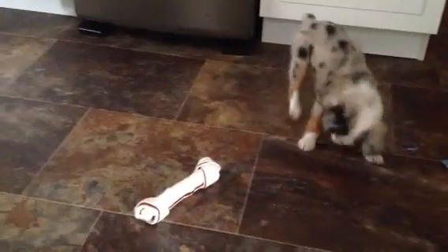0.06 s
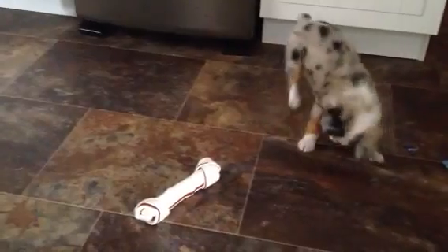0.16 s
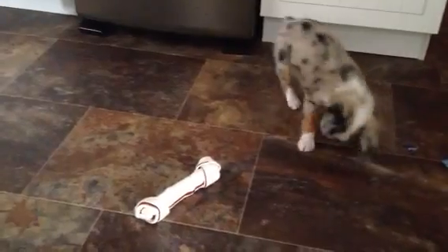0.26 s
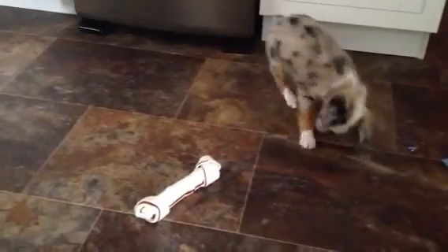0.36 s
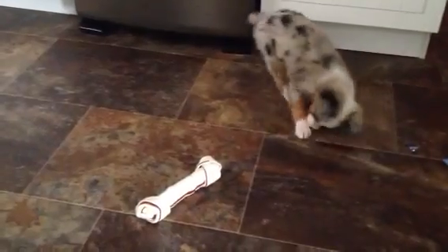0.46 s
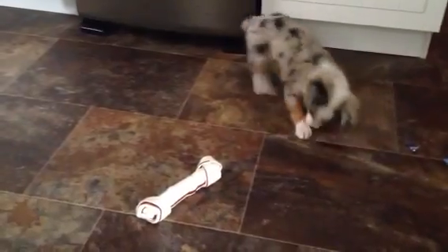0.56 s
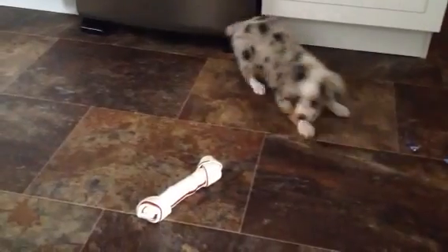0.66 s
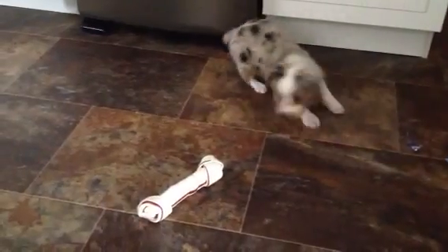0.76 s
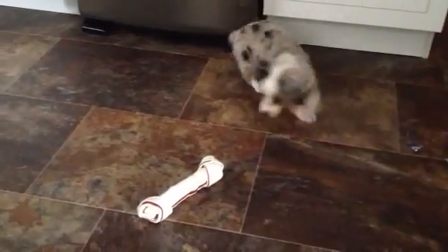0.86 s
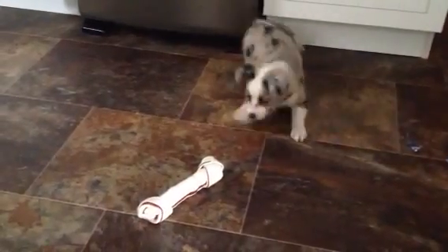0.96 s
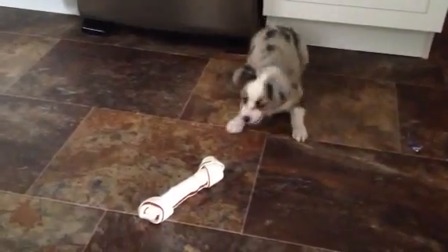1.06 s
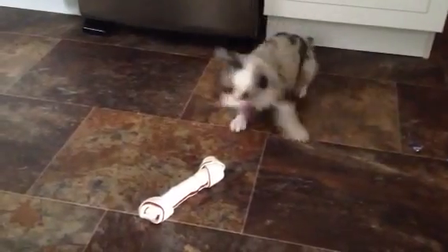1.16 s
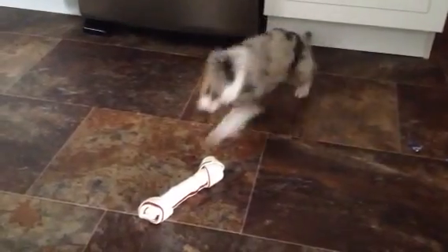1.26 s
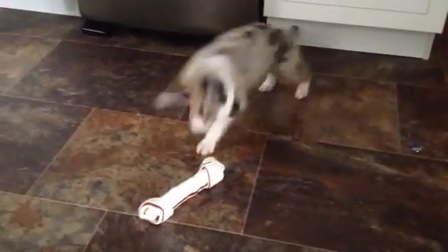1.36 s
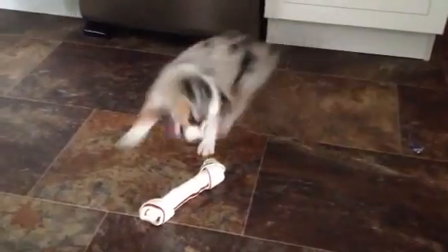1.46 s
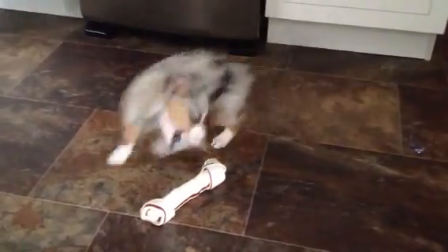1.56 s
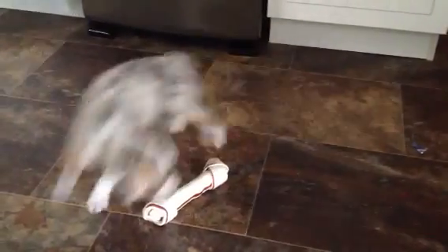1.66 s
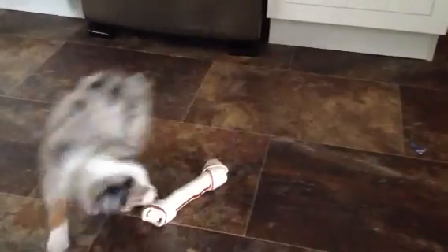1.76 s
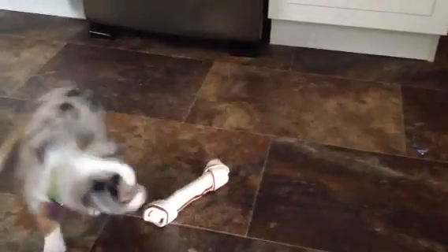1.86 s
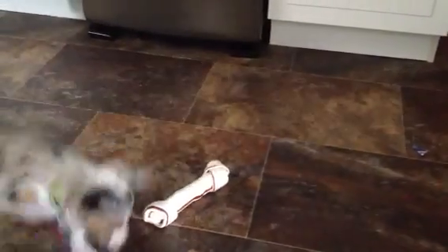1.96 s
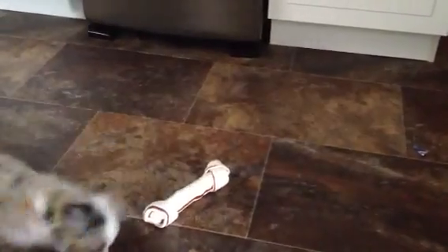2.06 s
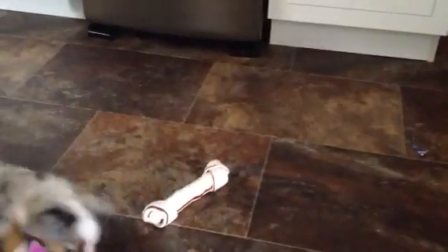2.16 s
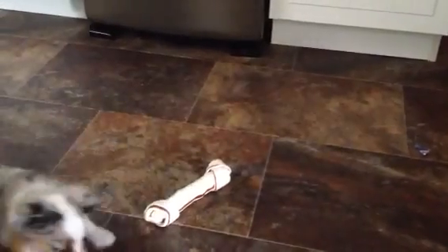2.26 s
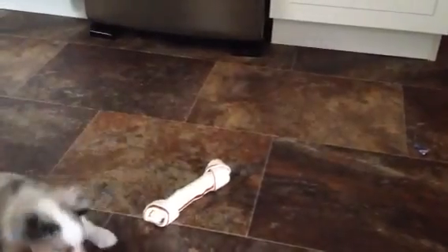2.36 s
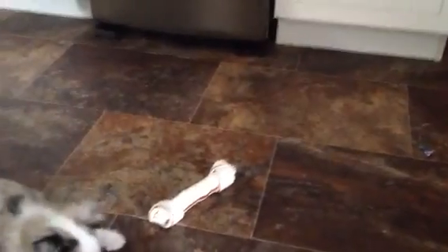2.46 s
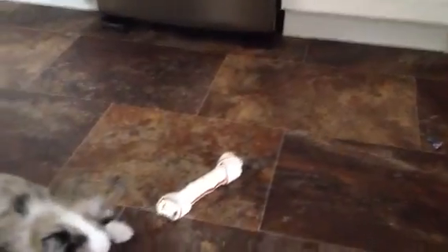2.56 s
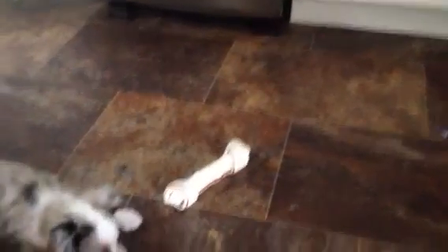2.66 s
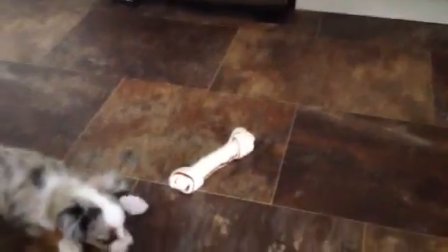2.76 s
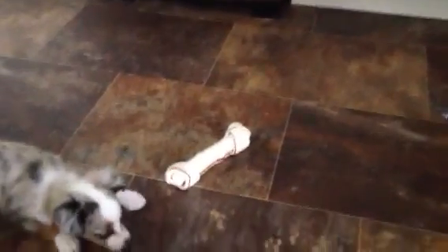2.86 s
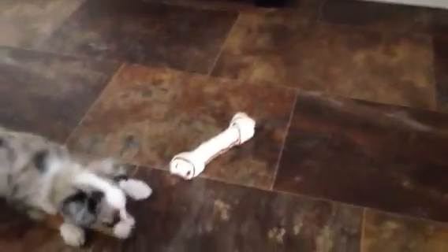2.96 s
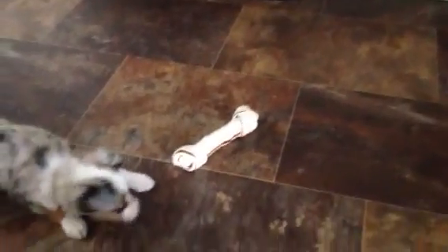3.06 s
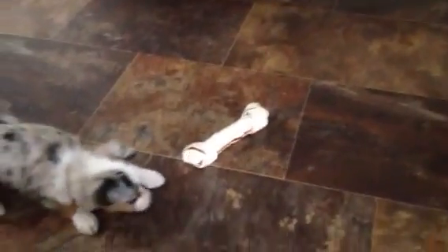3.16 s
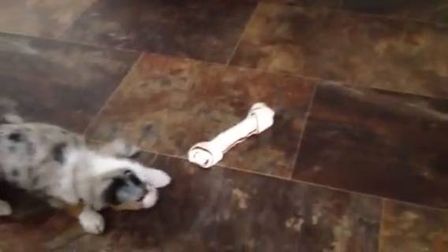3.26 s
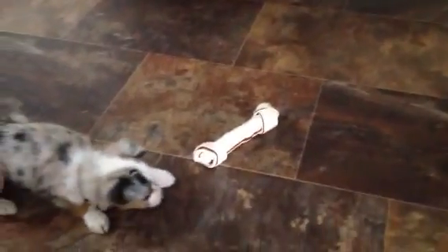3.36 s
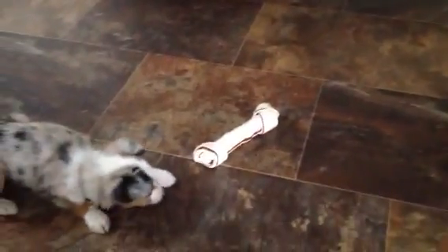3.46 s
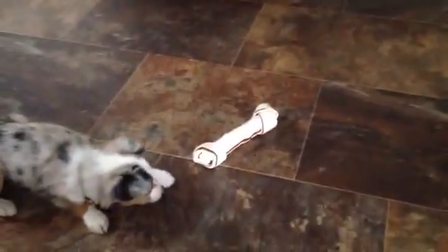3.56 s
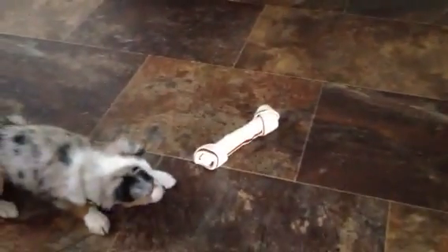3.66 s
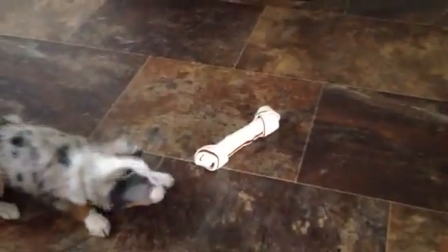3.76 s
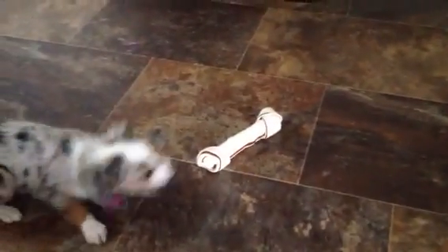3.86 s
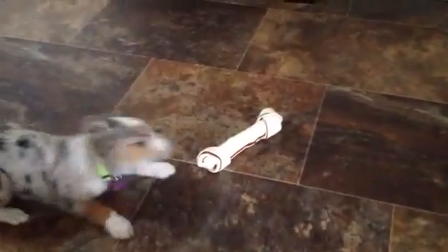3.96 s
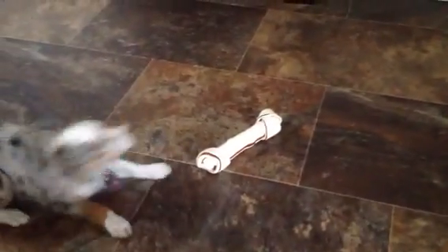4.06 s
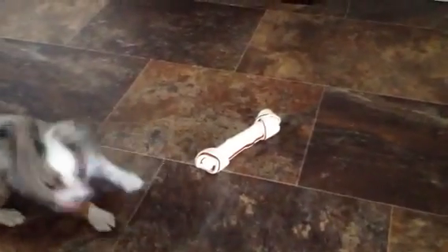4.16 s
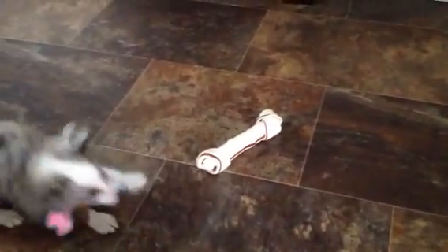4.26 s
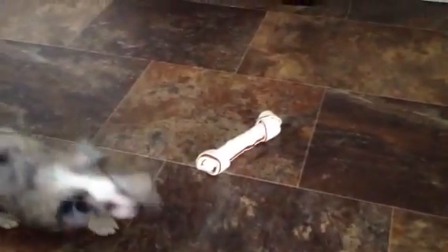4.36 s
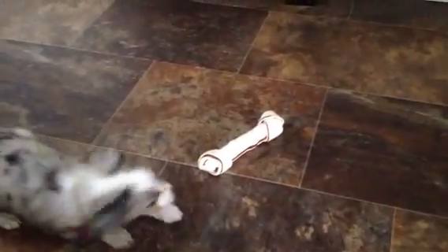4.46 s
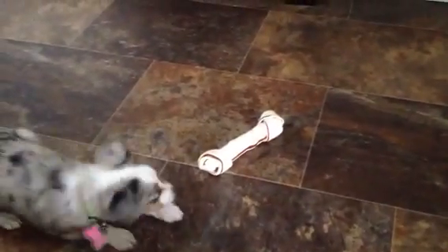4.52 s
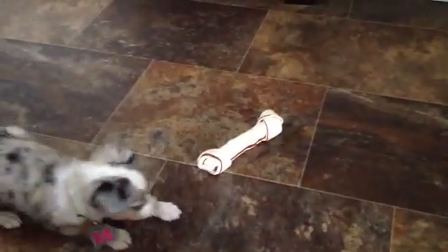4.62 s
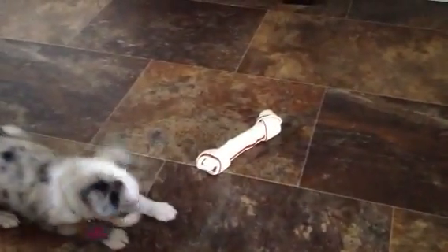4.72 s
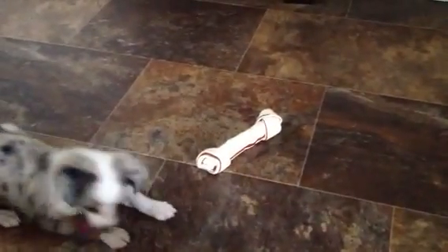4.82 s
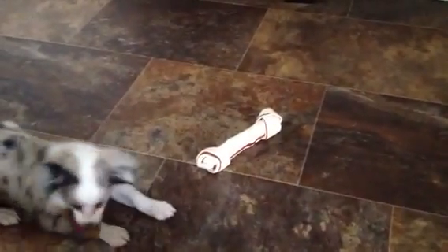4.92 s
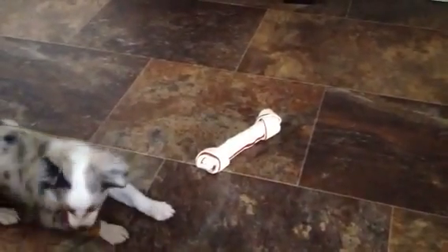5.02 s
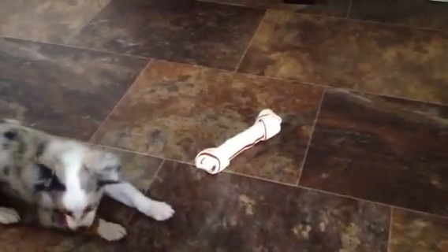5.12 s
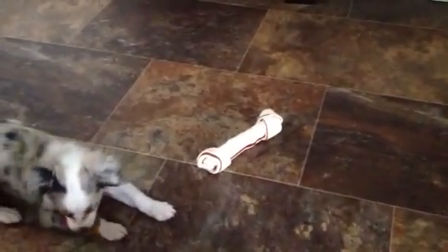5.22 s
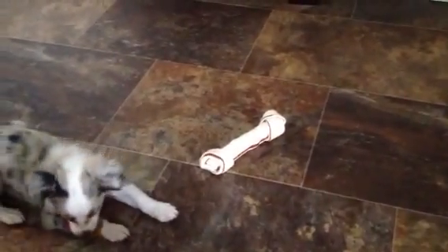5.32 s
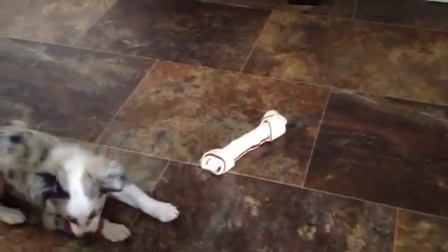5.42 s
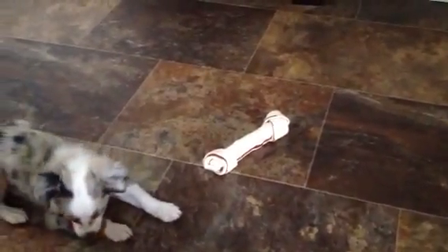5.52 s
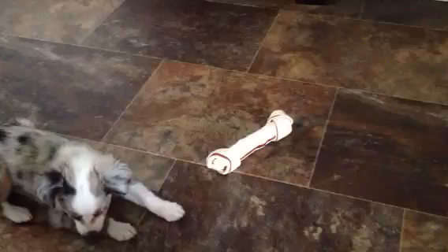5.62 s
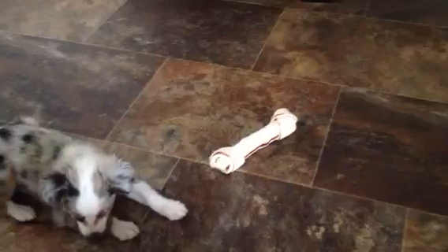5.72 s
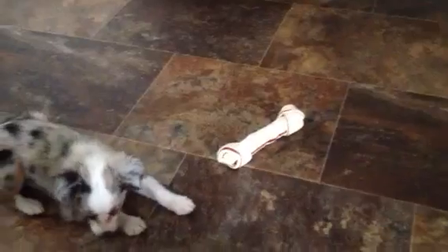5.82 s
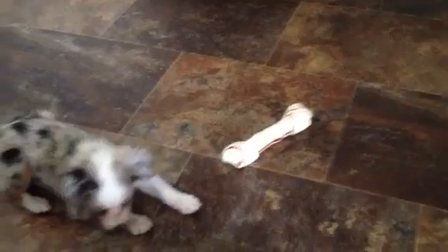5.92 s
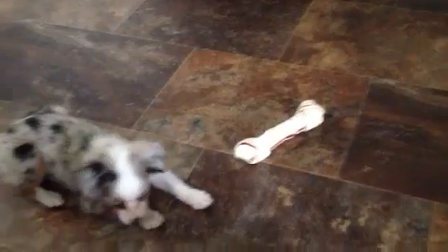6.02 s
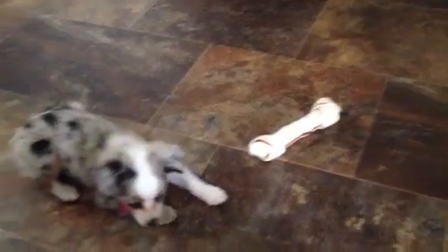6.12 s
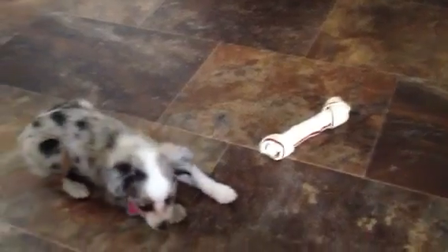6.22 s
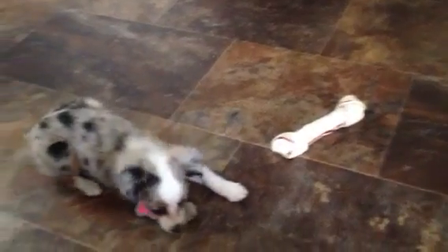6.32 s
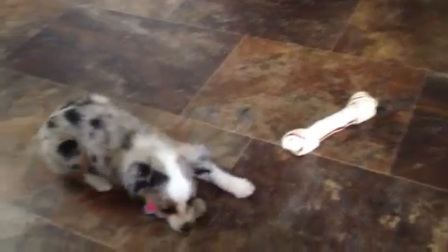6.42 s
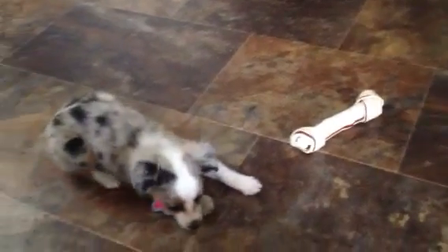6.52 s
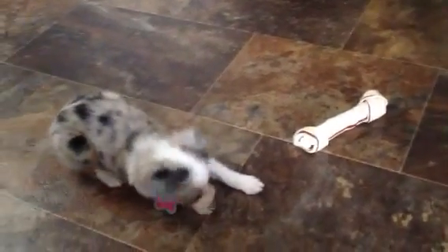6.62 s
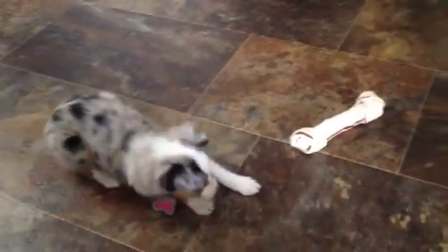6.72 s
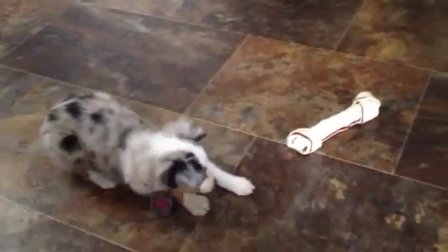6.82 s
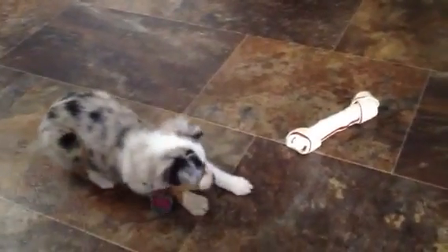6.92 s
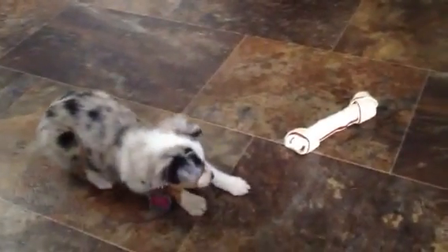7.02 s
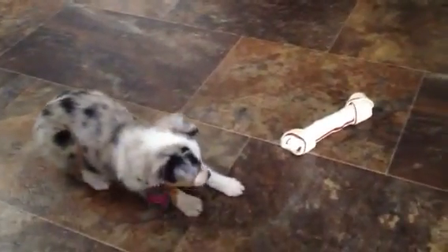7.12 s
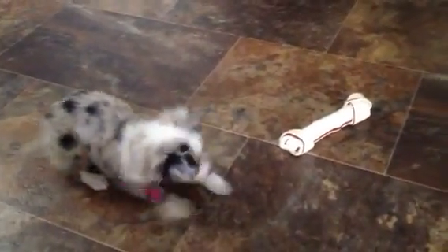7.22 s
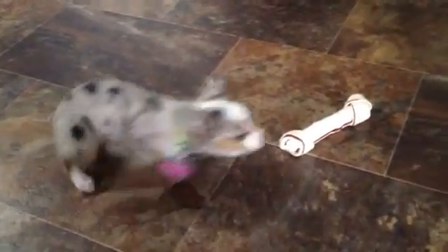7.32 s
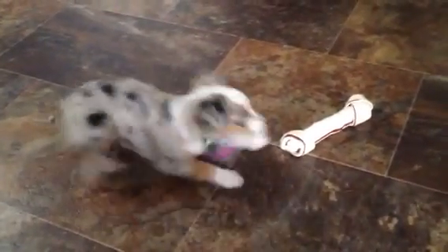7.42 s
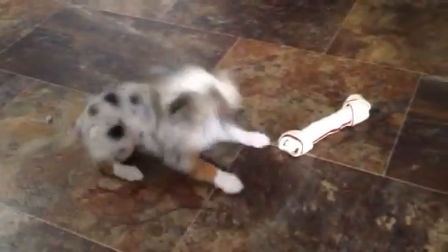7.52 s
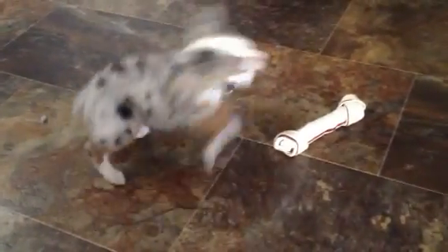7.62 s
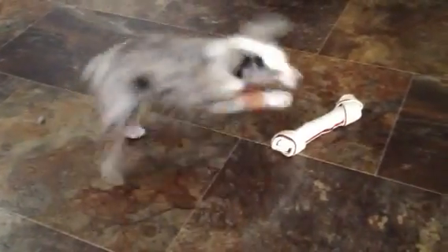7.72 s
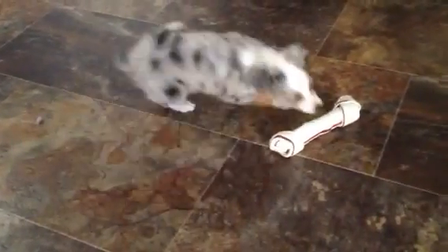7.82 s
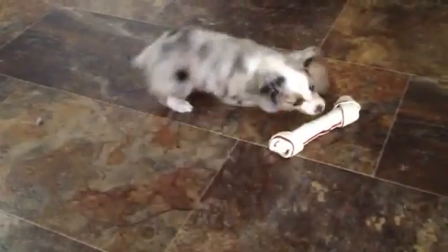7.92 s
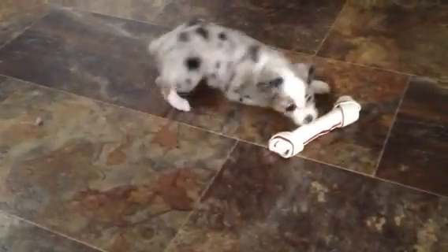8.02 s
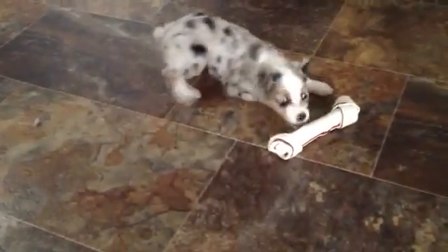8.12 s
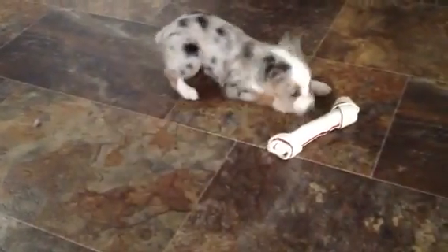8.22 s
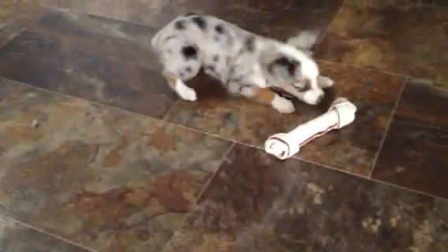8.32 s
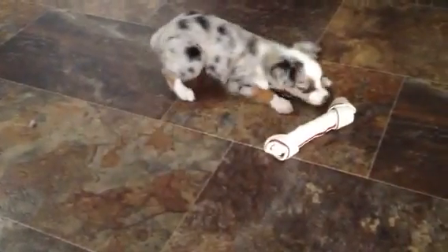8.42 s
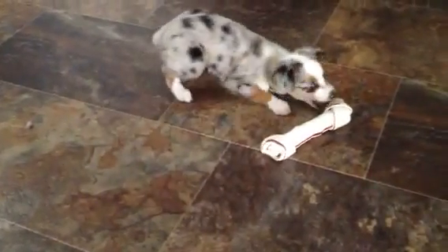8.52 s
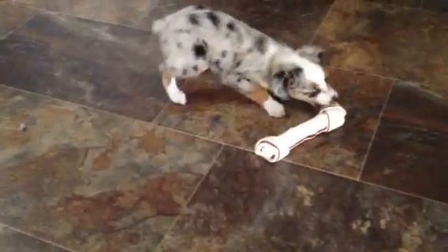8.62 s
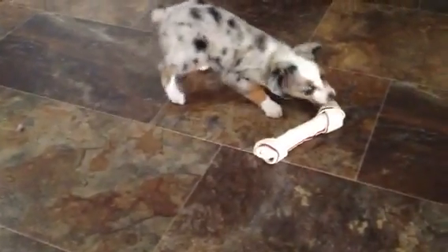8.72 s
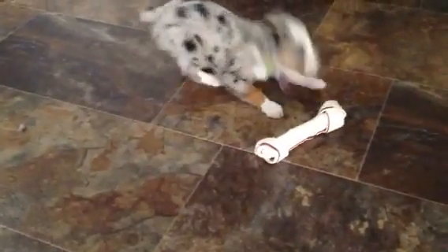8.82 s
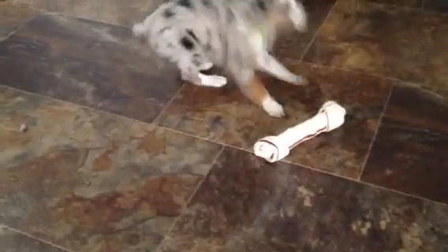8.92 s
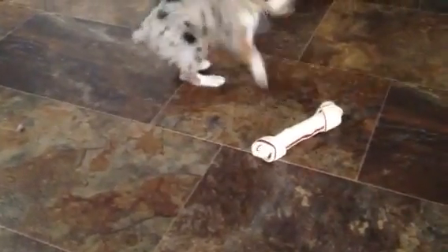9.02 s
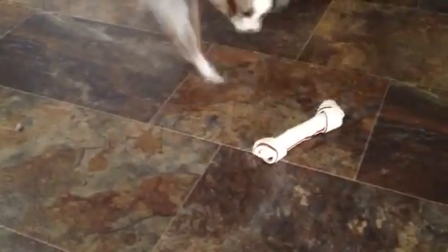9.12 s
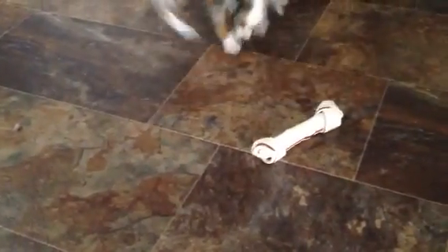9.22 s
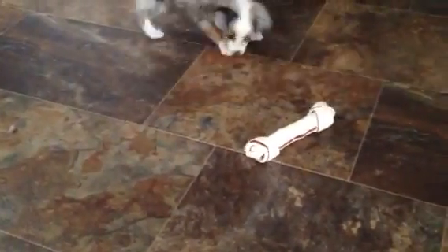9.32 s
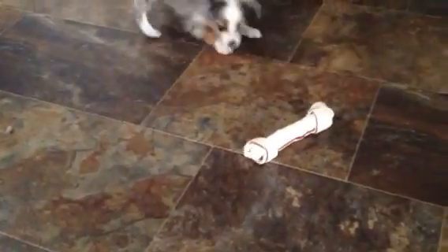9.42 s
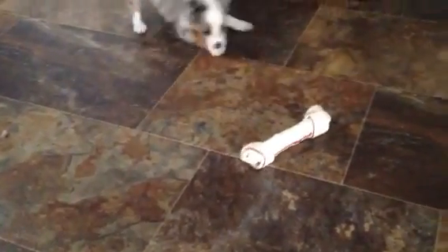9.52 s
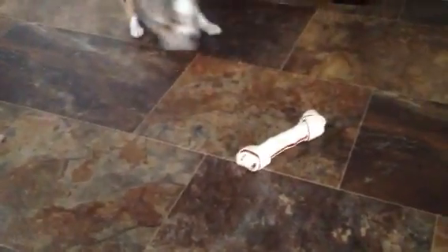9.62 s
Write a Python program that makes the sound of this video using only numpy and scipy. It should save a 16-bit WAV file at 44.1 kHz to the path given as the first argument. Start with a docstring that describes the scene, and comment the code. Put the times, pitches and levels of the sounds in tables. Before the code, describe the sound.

A faint, fan-like appliance hum with wavering low tones runs throughout a bare, reflective kitchen. From 0 to 1 s a small metal collar tag jingles brightly, with a brief snuffle, sliding pads and light paw landings around 1 s. Between 1.4 and 2.6 s the puppy scampers: claws click and skid on hard tile, the sharpest clack at 2.2 s, with soft thumps and tag rings. It then quiets to small ticks. At about 3.85 s comes a shrill, raspy yap in two pushes, answered by a tighter one at 4.4 s, each about a tenth of a second with a short room ring. Near-quiet follows, with tiny nose puffs past 6 s. Another yap pair comes at 7.3 and 7.8 s, the last hoarser and falling in pitch. Paws land at 8.0 s, faint sniffing follows, and at 9.4 s the tag rings hard with claw clacks and a snuffle.

```python
"""An appliance hums throughout: shaped noise plus wavering tones. A collar tag jingles from the start, as
decaying modes; pads slide (grainy noise), claws click and paws thump (damped sines), a nose snuffles (noise).
Near 4 s and again past 7 s a small puppy yaps in a pair, dancing round a chew bone on a hard kitchen floor:
fold harmonics and pulsed noise pass through resonances. The tag rings hard again near the end.
The bare room rings after every contact and yap; gain control pulls the yaps down."""
import sys
import numpy as np
from scipy import signal
from scipy.fft import rfft, irfft
from scipy.io import wavfile
from scipy.ndimage import uniform_filter1d, minimum_filter1d

SR = 44100
rng = np.random.default_rng(int(sys.argv[2]) if len(sys.argv) > 2 else 0)


def to_wav(sig):
    """Store sig (one row per channel, or 1-D mono) as 16-bit WAV at the path in sys.argv[1].

    Samples outside -1..1 are clipped; the rate is SR.
    """
    pcm = np.clip(np.atleast_2d(sig), -1, 1) * 32767
    pcm = np.round(pcm).astype(np.int16)
    wavfile.write(sys.argv[1], SR, pcm.T)  # frames by channels


N = 426879

# appliance air noise: (frequency [Hz], relative level [dB per Hz])
AIR_COLOUR = [(18, -76), (30, -48), (189, -4), (280, -7.5), (336, -7), (394, -8.5), (616, -15),
              (962, -14.5), (2120, -22.5), (4910, -29.5), (5900, -33.5), (8300, -31.5), (9970, -38.5),
              (14800, -35), (16000, -54)]
AIR_RMS_DB = -57.5
# appliance tones: (frequency [Hz], relative level [dB])
HUM_TONES = [(199.2, -66.5), (274.5, -65.5), (398.4, -64.5), (527.6, -72.5), (764.4, -69.5), (995.9, -72),
             (3171, -80), (3230, -86.5)]

# hard strikes of the tag on its ring: (time [s], relative peak [dB], relative level of top modes [dB])
TAG_STRIKES = [(0.0787, -37.5, -39), (0.6404, -26, -40), (0.9662, -19.5, -30), (0.9901, -26, -38),
               (1.077, -20.5, -29.5), (1.4476, -33.5, -53), (1.5803, -36.5, -40), (2.2044, -20, -54),
               (2.2483, -20.5, -30), (2.5057, -30.5, -43), (3.0734, -37, -41), (4.3026, -30, -66),
               (4.6129, -32, -41), (4.6448, -31, -62), (6.131, -42, -57.5), (6.3614, -41, -46),
               (6.7565, -44, -57.5), (7.4545, -17.5, -23), (8.0157, -27, -41), (8.0431, -29.5, -37),
               (8.4347, -37, -47), (8.9012, -37, -52), (8.9122, -31.5, -42), (9.4295, -13, -28.5),
               (9.4374, -17, -23.5), (9.4709, -20.5, -27.5), (9.5652, -27.5, -33.5)]
# modes of the tag: (frequency [Hz], relative level [dB], t60 [s])
TAG_MODES = [(4920, -10, 0.13), (7940, -5, 0.06), (8080, 2, 0.085), (8840, -5.5, 0.067), (9500, -19, 0.021),
             (11380, -13.5, 0.079), (12200, -10, .07), (13500, -9.5, .06), (14100, -14, .04)]
# light ticks of the swinging tag: (start [s], end [s], rate [1/s], relative peak [dB])
TAG_SWINGS = [(1.8, 2.1, 10, -39.5), (2.34, 2.48, 17, -40), (3.5, 3.88, 5.3, -44.5),
              (4.16, 4.27, 19, -33.5), (4.69, 5.12, 12, -47), (6.78, 7.12, 7, -53), (8.14, 8.7, 3.5, -35),
              (8.95, 9.4, 4.26, -40.5)]
# tag scraping its ring: (frequency [Hz], relative level [dB per Hz])
TAG_GRIT_COLOUR = [(2000, -27), (6500, -11.5), (8100, 3.5), (10000, -17), (14000, -13.0)]
TICK_TOP_DB = -24  # top modes of a tick against its peak
TAG_RINGS_DB, TAG_DAMPING = -23.5, 0.23  # softer contacts ring less: threshold; dB lost per dB below it

# pads and fur sliding on the floor: (time of maximum [s], relative level [dB], rise [s], fall [s])
SLIDES = [(0.38, -57.5, .25, 0.5), (0.79, -44, .09, .25), (1.03, -43, .08, .45), (1.82, -46, .22, .65),
          (2.46, -52.5, .3, 0.28), (9.0, -51, .3, .3)]
# slide noise: (frequency [Hz], relative level [dB per Hz])
SLIDE_COLOUR = [(530, -24.5), (900, -2), (1130, -18.5), (3580, -1), (5240, -3.5), (7860, 0), (9980, -6.5),
                (15500, -9.5)]
SLIDE_FADE_DB = -18  # level at both ends of a slide

# paws landing, levels relative:
# (time [s], knock [dB], knock pitch [Hz], snap [dB], thump [dB], thump pitch [Hz])
FOOTFALLS = [(0.613, -33, 1300, -43, -38.5, 287), (0.964, -26, 4760, -41, -34, 159.6),
             (1.046, -25.5, 1270, -27, -38, 181.4), (1.131, -26, 1690, -41, -35.5, 170),
             (1.374, -28, 1960, -49, -40, 160), (1.591, -40.5, 3960, -49, -40.5, 160),
             (1.63, -23, 3950, -46, -38.5, 159), (1.78, -15, 4330, -20.5, -32.5, 277),
             (1.827, -18, 3760, -29.5, -36, 170), (2.028, -25.5, 2050, -32, -42.5, 168),
             (2.088, -50, 1490, -58, -34, 170), (2.111, -33.5, 1130, -57, -30, 300),
             (2.19, -6, 1740, -9, -29.5, 295), (2.363, -14, 1820, -49, -37.5, 288),
             (2.432, -24.5, 1170, -26.5, -55, 165), (2.496, -26.5, 1930, -40, -46, 173),
             (2.556, -26.5, 1760, -32.5, -49, 173), (4.309, -31.5, 2515, -48.5, -64, 170),
             (8.018, -13.5, 1710, -45, -44.5, 162), (8.557, -34, 1643, -40, -61.5, 169),
             (9.314, -39.5, 1700, -58, -40, 158), (9.421, -9.5, 1530, -22.5, -30.5, 162),
             (9.529, -17, 1160, -33.5, -44, 168)]
# bouts of lighter claw taps: (start [s], end [s], rate [1/s], relative knock level [dB])
SCRABBLES = [(1.13, 1.2, 30, -26.5), (2.37, 2.41, 26, -23), (6.85, 7.15, 12, -45), (9.12, 9.22, 23, -41)]
# claw scrape: (frequency [Hz], relative level [dB per Hz])
CLAW_GRIT_COLOUR = [(200, -22), (700, -10.5), (1600, 1), (4000, 1), (9000, -7.0), (15000, -31.0)]
# floor noise under a thump: (frequency [Hz], relative level [dB per Hz])
THUMP_COLOUR = [(50, -68), (150, -8), (320, -9), (700, -40), (2000, -38.5)]
# pad scuffing as it lands: (frequency [Hz], relative level [dB per Hz])
SCUFF_COLOUR = [(100, -34.5), (250, -4), (450, 2.5), (800, -2.5), (1300, -10.5), (3000, -24.5),
                (9000, -44.5)]
TAP_HZ, TAP_SPREAD, TAP_SNAP_DB = 1900, 0.066, -33  # median pitch, its log spread, snap against knock
PAD_LAG_S = .002  # the pad meets the floor just after the claws
SCUFF_DB, SCUFF_DECAY_S = -11, .03  # level against the tabled thump level; decay
UNEVEN, SPREAD_DB = .2, 2  # light contacts stray in time (share of spacing) and in strength

# puffs through the nose: (time [s], length [s], level [dB])
SNUFFLES = [(0.682, 0.095, -39), (3.83, 0.042, -32), (6.111, 0.035, -59.5), (6.437, 0.045, -59),
            (8.388, 0.11, -51), (8.718, 0.24, -57), (9.333, 0.098, -40.5), (9.591, 0.071, -52)]
# nose noise: (frequency [Hz], relative level [dB per Hz])
NOSE_COLOUR = [(80, -48), (170, -3), (420, 2.5), (800, -5.5), (1700, 0.5), (2500, -5.5), (4200, -15.5),
               (6000, -25), (12000, -38)]

# yaps, the first in two pushes: (time [s], length [s], relative effort [dB], attack [s], release [s],
#   first pitch [Hz], held pitch [Hz], last pitch [Hz], glide curve [1 = straight], voice breaks at [s],
#   settles at [s], roughness [0-1], period doubling [0-1], mouth resonance before scaling [Hz],
#   throat level at first [dB], throat level once settled [dB], jaw opening once settled [0-1])
YAPS = [(3.845, .060, -5, 0.0095, 0.014, 1085, 1266, 1337, 1.1, .002, 0.076, 0.42, .9, 3300, 1, 0.5, .55),
        (3.905, .062, -4.5, 0.018, 0.012, 1317, 1258, 1275, 2.1, .004, .036, .72, .2, 3646, 2, -3.5, 0.0026),
        (4.394, 0.12, -7, .03, 0.0075, 1049, 1302, 1308, 1.9, 0.022, .075, .7, 0.18, 3904, 0.5, -17, 0.0011),
        (7.308, .121, -7.5, 0.017, 0.014, 1067, 1276, 1216, 1.9, .026, .076, .75, .05, 3680, 0.5, -11.5, 0.13),
        (7.77, 0.13, -5.5, .026, 0.037, 1601, 1287, 1203, 1.0, .001, 0.093, 0.53, .15, 3140, -6, -6, 0.65)]
# muzzle resonances: (frequency [Hz], width [Hz], level with jaw shut [dB], level with jaw open [dB])
MUZZLE_MODES = [(2607, 450, -6.5, -29.5), (4550, 230, -35.5, -4.5), (5500, 500, -32, -7.5),
                (6250, 290, -15, -8.5)]
# air that rushes past all resonances: (frequency [Hz], relative level [dB per Hz])
RUSH_COLOUR = [(40, -21.5), (150, -11.5), (330, 0), (600, -2), (1500, -3), (5000, -8), (7200, 1),
               (9500, -8.5), (13000, -7), (16000, -19)]
ONSET_DB, TIRE_DB, RELEASE_DB = -14.5, -2, -10  # effort swells, tires towards the end and lets go
GLIDE_SHARE = .7  # part of a yap that the pitch takes to reach its held value
ROUGH_BEFORE, ROUGH_AFTER, BREAK_S, SETTLE_S = .18, 0.075, .009, 0.024  # breaks fast, settles slowly
JAW_START, JAW_SETTLING = 0.94, .4  # opening at first and when the voice starts to settle
MOUTH_START, MOUTH_END, MOUTH_RISE_S = .88, 0.95, .028  # share of tabled Hz; rises as the lips draw back
MOUTH_WIDTH_HZ, MOUTH_CLEAN_DB, MOUTH_ROUGH_DB = 1700, -7, 1  # level; rise at roughness 1
PINCH_DB, PINCH_WIDTH_HZ = -7.5, 600  # closing the jaw sharpens the mouth resonance
THROAT_HZ, THROAT_WIDTH_HZ = 1320, 340  # lowest resonance, with the pitch at rest
THROAT_FOLLOW, RESTING_HZ = 0.46, 1270  # share of the pitch's distance from rest that it follows
NOTCH_HZ, NOTCH_WIDTH_HZ, NOTCH_DEPTH = 4960, 770, 1  # the nose swallows this band as the jaw closes

# room bands: (frequency [Hz], t60 [s], relative strength [dB])
ROOM_BANDS = [(150, 0.48, 2.5), (500, 0.24, 1.5), (1300, .41, 1), (2600, 0.46, -2), (3980, .38, -4),
              (7000, 0.52, -2), (14200, 0.24, -3)]
EDGE_HZ = 15650  # upper band limit


def amp(db):
    """Converts dB to amplitude."""
    return 10 ** (np.asarray(db) / 20)


def unit(x):
    """Scales to rms 1."""
    return x / np.sqrt(np.mean(x ** 2) + 1e-20)


def ramp(x):
    """Holds a share between 0 and 1."""
    return np.clip(x, 0, 1)


def blend(a, b, share):
    """Goes from a to b as share goes from 0 to 1."""
    return a + (b - a) * share


def read(points, hz):
    """Joins (Hz, value) points on a log-frequency axis."""
    f, value = np.transpose(points)
    return np.interp(np.log(hz + 1), np.log(f + 1), value)


def add(mix, s, sound):
    """Lays a sound into the mix at time s."""
    part = mix[max(round(s * SR), 0):][:len(sound)]
    part += sound[:len(part)]


def play(sounds):
    """Mixes (s, sound) pairs into one track."""
    track = np.zeros(N)
    for s, sound in sounds:
        add(track, s, sound)
    return track


def scatter(bouts):
    """Light contacts, unevenly spaced through each bout: (s, dB)."""
    for start, end, rate, db in bouts:
        for s in np.arange(start + .5 / rate, end, 1 / rate):
            late, strength = rng.standard_normal(2)
            yield s + UNEVEN * late / rate, db + SPREAD_DB * strength


def noise(colour, size):
    """Noise of rms 1 with the given spectrum."""
    spectrum = rfft(rng.standard_normal(size))
    gain = amp(read(colour, np.fft.rfftfreq(size, 1 / SR)))
    return unit(irfft(spectrum * gain, size))


def wander(hz, size):
    """Random motion of rms 1, rolling off steeply above hz."""
    spectrum = rfft(rng.standard_normal(size))
    rolloff = 1 + (np.fft.rfftfreq(size, 1 / SR) / hz) ** 4
    return unit(irfft(spectrum / rolloff, size))


def highpass(x, hz, order=2):
    """Attenuates what lies under hz."""
    return signal.sosfilt(signal.butter(order, hz, "high", fs=SR, output="sos"), x)


def lowpass(x, hz, order):
    """Attenuates what lies over hz."""
    return signal.sosfilt(signal.butter(order, hz, fs=SR, output="sos"), x)


def resonate(x, hz, width_hz):
    """A steep resonance of gain 1 that can follow a moving frequency."""
    turn = np.exp(2j * np.pi * np.cumsum(hz * np.ones(len(x))) / SR)
    r = np.exp(-np.pi * width_hz / SR)
    # shift the band to zero, low-pass, shift back
    slow = signal.lfilter([(1 - r) ** 2], [1, -2 * r, r * r], x / turn)
    return 2 * (turn * slow).real


def appliance(hum_db=-1, waver=0.084):
    """A fan's steady rush with faint motor tones wavering in phase and level."""
    t = np.arange(N) / SR
    tones = np.zeros(N)
    for hz, db in HUM_TONES:
        tone = np.sin(2 * np.pi * hz * t + wander(4.2, N))
        tones += amp(db) * np.sqrt(2) * tone * (1 + waver * wander(4.9, N))
    return amp(AIR_RMS_DB) * noise(AIR_COLOUR, N) + amp(hum_db) * tones


def jingle(s, db, top_db, chatter_s=.006, bounce=.4, vary_db=3, detune=.006, scrape_db=4,
           scrape_s=0.0039, gain_db=1, top_gain_db=6):
    """The tag scrapes and chatters on its ring; the grip of each contact bends and reweights its modes."""
    t = np.arange(6000) / SR
    sound = np.zeros(len(t))
    ring_gain = amp(TAG_DAMPING * min(db - TAG_RINGS_DB, 0))
    for k, delay_s in enumerate(np.cumsum([0, *rng.exponential(chatter_s, size=2)])):
        ring = np.zeros(len(t))
        for hz, level_db, t60_s in TAG_MODES:
            decay = amp(level_db + vary_db * rng.standard_normal() - 60 * t / t60_s)
            bent_hz = hz * (1 + detune * rng.standard_normal())
            ring += decay * np.sin(2 * np.pi * (bent_hz * t + rng.random()))
        scrape = amp(scrape_db) * np.exp(-t / scrape_s) * noise(TAG_GRIT_COLOUR, len(t))
        add(sound, delay_s, bounce ** k * (ring_gain * ring + scrape))
    # the top modes have their own level
    low = lowpass(sound, 10400, order=6)
    top = highpass(sound, 10400, order=6)
    return s, amp(db + gain_db) * low / abs(low).max() + amp(top_db + top_gain_db) * top / abs(top).max()


def collar():
    """The tag rings when it is jolted and ticks while it swings."""
    strikes = play(jingle(*row) for row in TAG_STRIKES)
    ticks = play(jingle(s, db, db + TICK_TOP_DB) for s, db in scatter(TAG_SWINGS))
    return strikes + ticks


def slide(s, db, rise_s, fall_s, grain_db=3.5, gain_db=-2):
    """Grainy friction of pads and fur, swelling and dying with each skid."""
    t = np.arange(-rise_s, fall_s, 1 / SR)
    grains = unit(noise(SLIDE_COLOUR, len(t)) * amp(grain_db * wander(210, len(t))))
    level_db = db + gain_db + SLIDE_FADE_DB * np.maximum(-t / rise_s, t / fall_s)
    return s - rise_s, amp(level_db) * grains * signal.windows.tukey(len(t), .05)


def claw(s, db, hz, snap_db, scrape_db=-21, scrape_s=0.008, gain_db=4, snap_gain_db=6,
         snap_hz=3300, snap_s=0.00037, ring_db=-25, ring_s=0.0098):
    """A hard snap, a knock that dies within a cycle or two, then a faint ring and a short gritty scrape."""
    t = np.arange(2000) / SR
    knock = np.exp(-t * hz) * np.sin(2 * np.pi * hz * t)
    snap = np.exp(-t / snap_s) * np.sin(2 * np.pi * snap_hz * t)
    ring = amp(ring_db) * np.exp(-t / ring_s) * np.sin(2 * np.pi * hz * t)
    scrape = amp(scrape_db) * noise(CLAW_GRIT_COLOUR, len(t)) * np.exp(-t / scrape_s)
    body = knock + ring + scrape
    # neighbouring modes swing in opposite senses, so the band between them is filled
    return s, highpass(amp(db + gain_db) * body - amp(snap_db + snap_gain_db) * snap, 850)


def thump(s, db, hz, rise_s=0.012, fall_s=0.019, gain_db=-1):
    """A soft paw pushes the floor, which booms briefly."""
    t = np.arange(8000) / SR
    body = np.sin(2 * np.pi * hz * t) + 0.43 * noise(THUMP_COLOUR, len(t))
    sound = highpass(body * (1 - np.exp(-t / rise_s)) * np.exp(-t / fall_s), 84)
    return s, amp(db + gain_db) * sound / abs(sound).max()


def scuff(s, db):
    """The pad skids a little before it grips."""
    t = np.arange(7000) / SR
    grit = noise(SCUFF_COLOUR, len(t)) * np.exp(-t / SCUFF_DECAY_S)
    return s, amp(db + SCUFF_DB) * grit * signal.windows.tukey(len(t), .05)


def paws():
    """The claws' clicks and the pads' thumps and scuffs, as two tracks."""
    claws = play(claw(*row[:4]) for row in FOOTFALLS)
    pads = play(thump(s + PAD_LAG_S, db, hz) for s, *_, db, hz in FOOTFALLS)
    pads += play(scuff(s + PAD_LAG_S, db) for s, *_, db, hz in FOOTFALLS)
    for s, db in scatter(SCRABBLES):
        tap_hz = TAP_HZ * np.exp(TAP_SPREAD * rng.standard_normal())
        add(claws, *claw(s, db, tap_hz, db + TAP_SNAP_DB))
    return claws, pads


def snuffle(s, length_s, db):
    """A puff of air swells and dies in the nose."""
    size = int(length_s * SR)
    return s, amp(db) * unit(noise(NOSE_COLOUR, size) * np.hanning(size))


def gesture(t, length_s, db, attack_s, release_s, first_hz, held_hz, last_hz, bend, break_s, settle_s,
            chaos, doubling, mouth_hz, open_db, shut_db, last_jaw):
    """One yap's course: effort, pitch, roughness, period doubling, mouth and throat resonance, jaw."""
    u = t / length_s
    effort_db = db + ONSET_DB * (1 - ramp(t / attack_s)) + TIRE_DB * u ** 2
    effort_db += RELEASE_DB * ramp(1 + (t - length_s) / release_s)
    hz = held_hz + (first_hz - held_hz) * ramp(1 - u / GLIDE_SHARE) ** bend
    hz += (last_hz - held_hz) * ramp((u - GLIDE_SHARE) / (1 - GLIDE_SHARE))
    broken = ramp(.5 + (t - break_s) / BREAK_S)
    settled = ramp(.5 + (t - settle_s) / SETTLE_S)
    rough = blend(blend(ROUGH_BEFORE, chaos, broken), ROUGH_AFTER, settled)
    jaw = ramp(blend(blend(JAW_START, JAW_SETTLING, ramp(t / settle_s)), last_jaw, settled))
    moving_mouth_hz = mouth_hz * blend(MOUTH_START, MOUTH_END, ramp(t / MOUTH_RISE_S))
    throat_db = blend(open_db, shut_db, settled)
    return effort_db, hz, rough, doubling * (1 - settled), moving_mouth_hz, throat_db, jaw


def yap(s, length_s, *shape, jitter=.08, jitter_hz=330, waver=0.0058, rasp=1.0, leak_db=-28,
        rush_db=-25, chest_db=-22):
    """Vocal folds start fairly clean, break into chaos, and settle again as the jaw moves."""
    t = np.arange(0, length_s + 0.0074, 1 / SR)
    effort_db, hz, rough, doubling, mouth_hz, throat_db, jaw = gesture(t, length_s, *shape)
    rough, size = np.clip(rough, 0, 1), len(t)
    shaken_hz = hz * (1 + jitter * rough * wander(jitter_hz, size) + waver * wander(130, size))
    turns = np.cumsum(shaken_hz) / SR
    folds = unit(sum(np.cos(2 * np.pi * k * turns) / np.sqrt(k) for k in range(1, 8)))
    half = doubling * np.cos(np.pi * turns)  # strong and weak cycles alternate
    puffs = unit((1 + np.cos(2 * np.pi * turns)) * rng.standard_normal(size))  # air escapes once a cycle
    drive = (1 - 1.1 * rough) * folds * (1 + half) + rasp * 2 * rough * puffs
    throat_hz = THROAT_HZ + THROAT_FOLLOW * (hz - RESTING_HZ)
    voice = amp(throat_db) * resonate(drive, throat_hz, THROAT_WIDTH_HZ)
    voice += amp(MOUTH_CLEAN_DB + MOUTH_ROUGH_DB * rough) * resonate(drive, mouth_hz, MOUTH_WIDTH_HZ)
    voice += amp(PINCH_DB) * (1 - jaw) * resonate(drive, mouth_hz, PINCH_WIDTH_HZ)
    for mode_hz, width_hz, shut_db, open_db in MUZZLE_MODES:
        voice += amp(blend(shut_db, open_db, jaw)) * resonate(drive, mode_hz, width_hz)
    voice -= NOTCH_DEPTH * (1 - jaw) * resonate(voice, NOTCH_HZ, NOTCH_WIDTH_HZ)
    voice = highpass(voice - amp(leak_db) * drive, 1000, order=4)
    voice = lowpass(voice, 6600, order=12)
    rush = amp(rush_db) * np.sqrt(rough) * noise(RUSH_COLOUR, size)
    chest = amp(chest_db) * half  # the half-pitch tone leaves through the chest
    return s, amp(effort_db) * (unit(voice) + rush + chest) * signal.windows.tukey(size, .04)


def kitchen(x, first_s=0.0031, build_s=0.0052):
    """Dense reflections from tile and cabinets, each band dying at its own speed."""
    taps = rng.standard_normal(SR) * (rng.random(SR) < 3000 / SR)  # about 3000 a second
    taps *= np.clip((np.arange(SR) / SR - first_s) / build_s, 0, 1)
    hz, t, bands = signal.stft(taps, SR, nperseg=256)
    t60_s = read([(row[0], row[1]) for row in ROOM_BANDS], hz)[:, None]
    strength_db = read([(row[0], row[2]) for row in ROOM_BANDS], hz)[:, None]
    tail = signal.istft(bands * amp(strength_db - 60 * t / t60_s), SR, nperseg=256)[1]
    return signal.fftconvolve(x, tail / np.linalg.norm(tail))[:N]


def scene(voice_db=2.5, voice_wet_db=-7.5, claw_wet_db=-6, body_wet_db=-7):
    """The puppy, its room and the hum; each kind of sound reaches the walls by its own amount."""
    hum = appliance()
    body = collar() + play(slide(*row) for row in SLIDES)
    claws, pads = paws()
    body += pads + play(snuffle(*row) for row in SNUFFLES)
    voice = amp(voice_db) * play(yap(*row) for row in YAPS)
    echo = kitchen(amp(voice_wet_db) * voice + amp(claw_wet_db) * claws + amp(body_wet_db) * body)
    return (voice + claws + body + echo + hum)[None]


def record(dry, threshold_db=-12, recovery_db_per_s=5.0, slope=0.65, start_db=6):
    """Gain control starts low, ducks at loud yaps, recovers slowly; then peak limiter and band limit."""
    power_db = 10 * np.log10(abs(uniform_filter1d(dry[0] ** 2, size=900)) + 1e-12)
    fall_db = np.arange(N) / SR * recovery_db_per_s
    # peak hold with linear decay; start and recovery are scaled by slope below
    held_db = np.maximum(np.maximum.accumulate(power_db + fall_db) - threshold_db, start_db)
    excess_db = np.maximum(held_db - fall_db, 0)
    x = dry / amp(slope * uniform_filter1d(excess_db, size=400))
    limit = minimum_filter1d(1 / np.maximum(abs(x), 1), size=201)
    x = x * uniform_filter1d(limit, size=201)
    band_limit = signal.firwin(511, EDGE_HZ, window=("kaiser", 9), fs=SR)
    return signal.oaconvolve(x, band_limit[None], "same")


dry = scene()
out = record(dry)
to_wav(out)
```